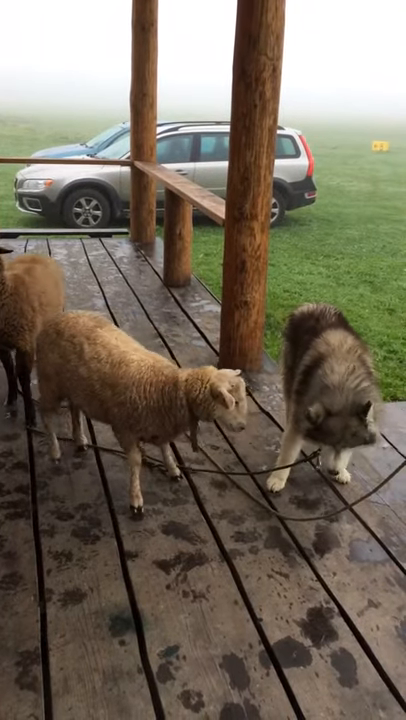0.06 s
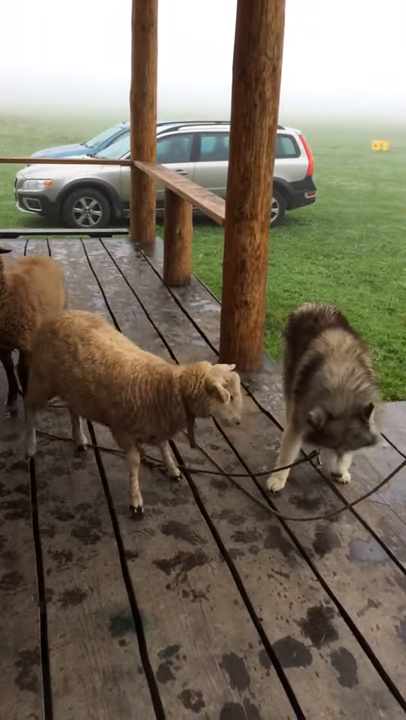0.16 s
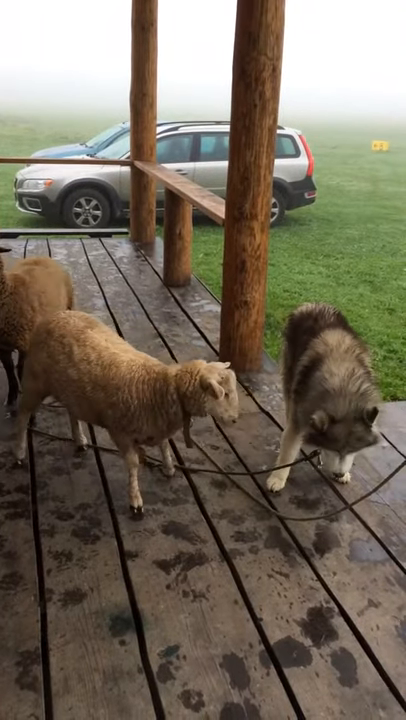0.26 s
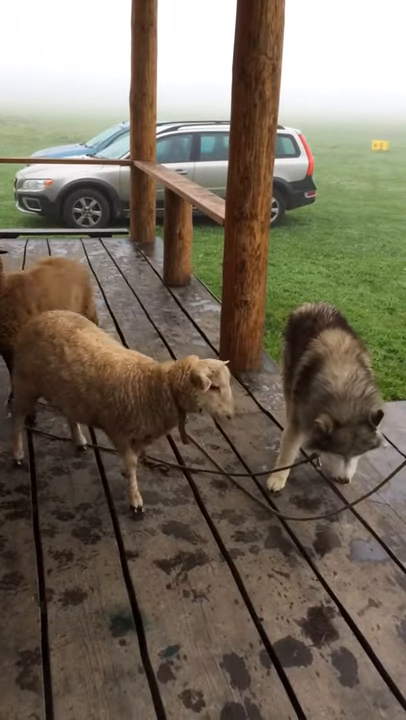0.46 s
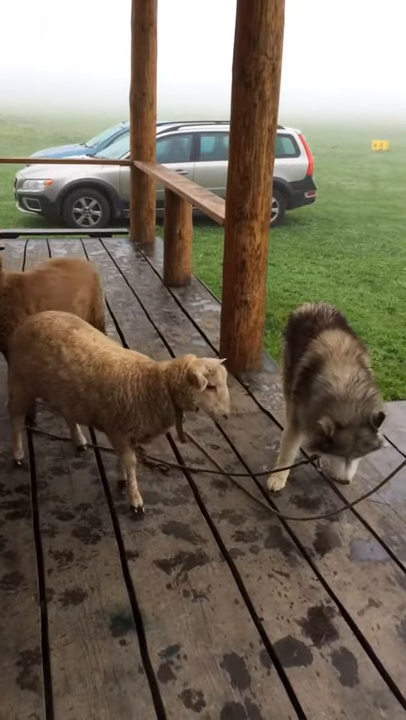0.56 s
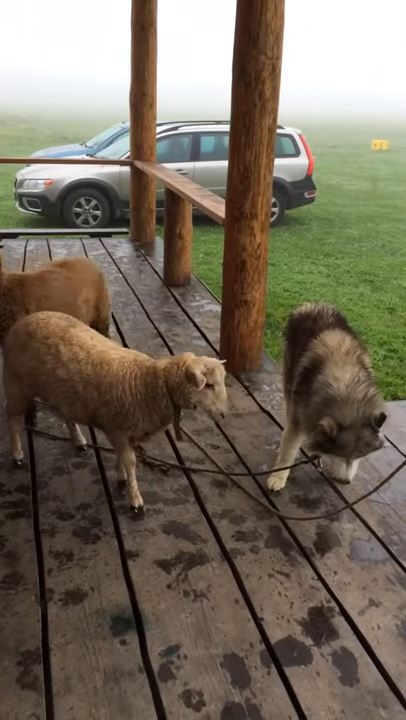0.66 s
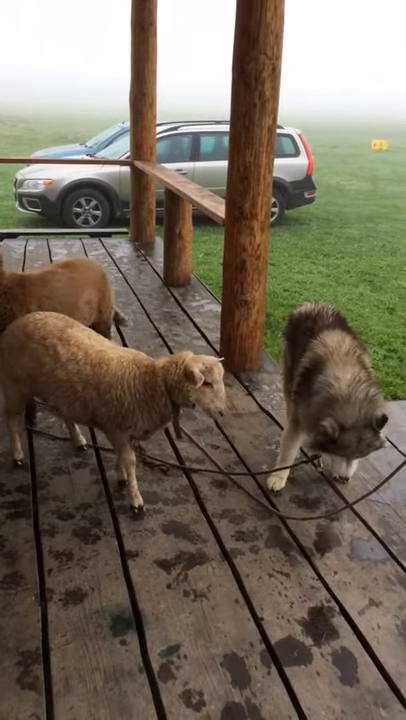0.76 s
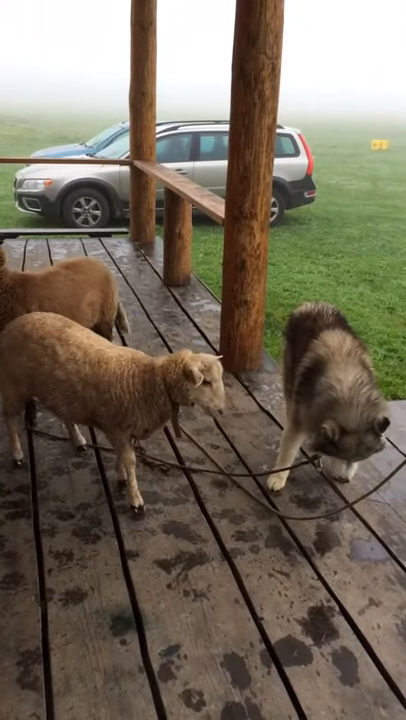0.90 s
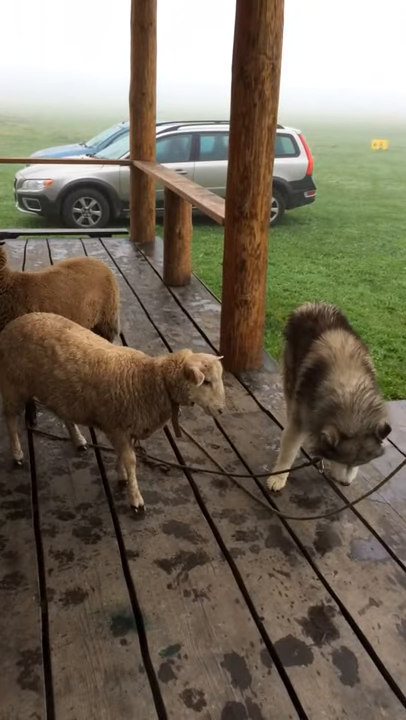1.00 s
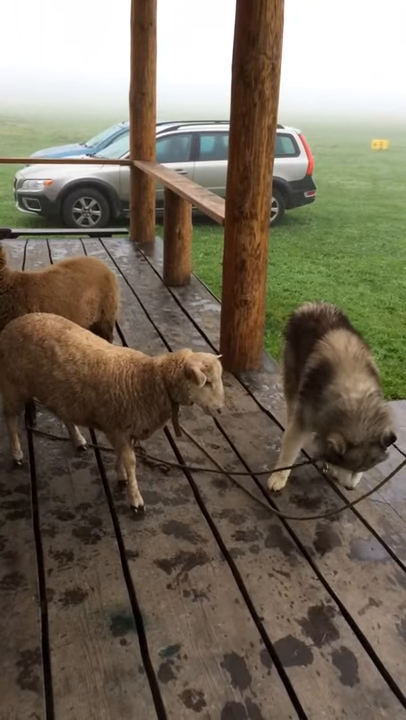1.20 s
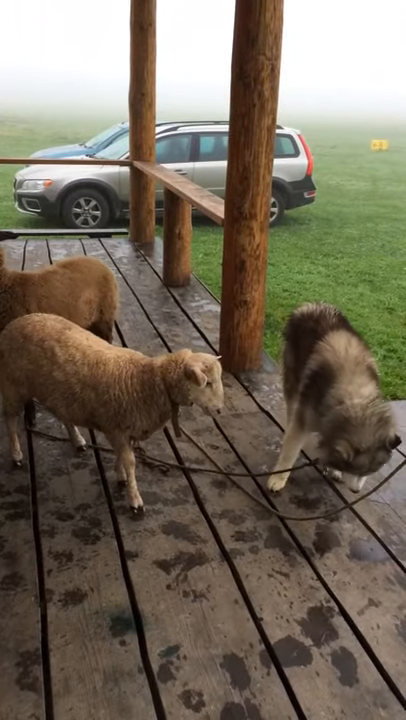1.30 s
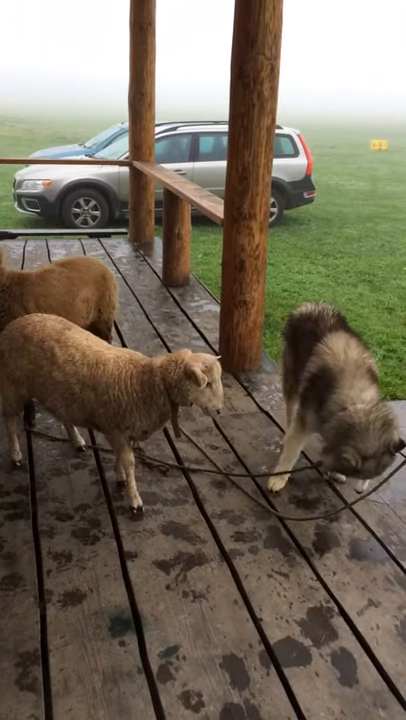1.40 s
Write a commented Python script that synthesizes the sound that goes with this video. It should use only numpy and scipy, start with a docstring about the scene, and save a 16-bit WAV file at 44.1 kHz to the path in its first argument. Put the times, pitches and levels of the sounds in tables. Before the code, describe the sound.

A few dull hoof knocks and thumps as sheep shift on a wooden porch.

```python
"""Sheep on a wet porch

Sheep shift their feet on the wet planks of a roofed wooden porch. Each hoof knocks on a plank,
then the weight thumps the deck, whose flexing wave runs back and forth along the boards.
Wet soles splat and scuff; the roof and wall answer briefly over quiet outdoor air."""
import sys
import numpy as np
from scipy import signal
from scipy.fft import rfft, irfft, next_fast_len
from scipy.io import wavfile
from scipy.ndimage import uniform_filter1d

SR = 44100
rng = np.random.default_rng(int(sys.argv[2]) if len(sys.argv) > 2 else 0)


def materialize(psi):
    """Save the field psi as 16-bit PCM at rate SR to the path in sys.argv[1].

    A 1-D psi becomes a single channel; in a 2-D psi each row is a channel.
    """
    bounded = np.clip(np.atleast_2d(psi).T, -1, 1)
    quanta = np.round(bounded * 32767).astype(np.int16)
    wavfile.write(sys.argv[1], SR, quanta)


N = 63945
EVENT_SAMPLES = SR // 2  # room for one hit and its tail


def amp(db):
    """Decibels to gain."""
    return 10 ** (np.asarray(db) / 20)


def unit_energy(x):
    """Scale x to a summed square of 1."""
    return x / np.sqrt(np.sum(x ** 2) + 1e-20)


def along(points, hz):
    """Read a curve of (frequency, value) points on a log frequency axis."""
    freqs, values = np.transpose(points)
    return np.interp(np.log(hz + 1), np.log(freqs + 1), values)


def clock(size=N):
    """Time of every sample in seconds."""
    return np.arange(size) / SR


def fade(t, t60):
    """Exponential decay, 60 dB down at t60."""
    return np.exp(-np.log(1000) * t / t60)


def add(track, start_s, x):
    """Mix x into the track from start_s on."""
    i = max(0, round(start_s * SR))
    track[i:i + len(x)] += x[:len(track) - i]


def noise(spectrum, size=N):
    """Coloured noise of rms 1."""
    padded = next_fast_len(size)
    colour = amp(along(spectrum, np.fft.rfftfreq(padded, 1 / SR)))
    x = irfft(rfft(rng.standard_normal(padded)) * colour, padded)[:size]
    return x / x.std()


def pulse(gain, size=4096):
    """Tight, minimum-phase pulse whose spectrum is gain(Hz)."""
    hz = np.fft.rfftfreq(size, 1 / SR)
    cepstrum = irfft(np.log(np.maximum(gain(hz), 1e-6)))
    cepstrum[1:size // 2] *= 2
    cepstrum[size // 2 + 1:] = 0
    return irfft(np.exp(rfft(cepstrum)))


def damped(modes):
    """One damped sine for each row of (frequency [Hz], level [dB], t60 [s])."""
    t = clock(EVENT_SAMPLES)
    return np.array([amp(db) * fade(t, t60) * np.sin(2 * np.pi * hz * t) for hz, db, t60 in modes])


def ring(sines, scatter_db=2):
    """The modes ring together, balanced a little differently at each blow."""
    gains = amp(scatter_db * rng.standard_normal((len(sines), 1)))
    return np.sum(gains * sines, axis=0)


def background(air_db=-68):
    """A bed of quiet outdoor air, with faint swishes as the animals move."""
    # dark outdoor air (frequency [Hz], level [dB])
    air_colour = [(15, -30), (28, -15), (60, -3), (100, 2.5), (160, 1.5), (300, -8.5), (600, -16),
                  (900, -16.5), (1400, -22.5), (6500, -26.5), (15000, -31.5)]
    # swish cues (centre time [s], level [dB], half length [s])
    swishes = [(0.47, -75, 0.056), (0.643, -72, 0.045), (1.28, -73.5, 0.051)]
    # swish tone (frequency [Hz], level [dB])
    swish_colour = [(200, -1), (900, 4.5), (2000, 2.5), (4500, -0.5), (7000, 2), (10000, -5), (15000, -26)]
    swell = sum(amp(db) * np.exp(-((clock() - s) / half_s) ** 2 / 2) for s, db, half_s in swishes)
    return amp(air_db) * noise(air_colour) + swell * noise(swish_colour)


def porch(x, room_db, predelay_s=0.0043, rise_s=0.0017, late_db=-24.5, late_t60=0.56):
    """Add the scattered answer of roof, posts and wall, different for every spot."""
    # decay of the short reverb (frequency [Hz], t60 [s])
    porch_t60 = [(150, 0.26), (1000, 0.12), (3000, 0.12), (7000, 0.17), (12000, 0.1)]
    hz, t, wash = signal.stft(rng.standard_normal(EVENT_SAMPLES), SR, nperseg=256)
    decay = fade(t, along(porch_t60, hz)[:, None]) + amp(late_db) * fade(t, late_t60)
    tail = signal.istft(wash * decay, SR, nperseg=256)[1]
    build_up = 1 - np.exp(-np.maximum(clock(len(tail)) - predelay_s, 0) / rise_s)
    answer = unit_energy(signal.fftconvolve(x, tail * build_up)[:len(x)])
    return x + amp(room_db) * np.sqrt(np.sum(x ** 2)) * answer


def splats(grain=0.5):
    """The film of water under a foot bursts in a short, grainy spray."""
    # wet splats and scuffs (time [s], level [dB], attack [s], t60 [s])
    cues = [(.056, -63.5, 0.0019, 0.022), (0.1868, -55, 0.00035, 0.015), (0.2223, -53.5, 0.00012, 0.031),
            (0.502, -51, 0.0021, 0.024), (0.615, -66, 0.0015, 0.02), (0.718, -56, 0.00055, 0.012),
            (0.7258, -58.5, .0004, .009), (.745, -59.5, 0.0025, 0.03), (0.822, -65.5, 0.00033, 0.028),
            (0.975, -60.5, 0.0015, 0.023)]
    # spray tone (frequency [Hz], level [dB])
    wet_colour = [(300, 11), (1500, 0.5), (4000, 0), (5000, -4), (7000, -1), (9500, -5.5), (12000, -4),
                  (15000, -11.5)]
    out, t = np.zeros(N), clock(EVENT_SAMPLES)
    for s, db, attack_s, t60 in cues:
        envelope = (1 - np.exp(-t / attack_s)) ** 2 * fade(t, t60)
        clumps = uniform_filter1d(rng.standard_normal(len(t)), size=24)
        spray = noise(wet_colour, size=len(t)) * np.exp(grain * clumps / clumps.std())
        splat = amp(db) * spray / spray.std() * envelope / envelope.max()
        add(out, s, porch(splat, room_db=2.5))
    return out


def trim_lows(x, low_cut_hz=62):
    """Knocks and thumps lose their deepest motion, below about 62 Hz."""
    return signal.sosfiltfilt(signal.butter(2, low_cut_hz, 'highpass', fs=SR, output='sos'), x)


def thumps(passes=4, deck_hz=170, joist_db=-21.5):
    """The weight shakes the joists and launches a flexing wave that runs to and fro in the deck."""
    # weight landing (time [s], level [dB], pitch [Hz], half length [s], return loss [dB], round trip [s])
    cues = [(0.091, -56.5, 159, 0.0082, 4, .056), (.255, -36.5, 152, .010, 7, 0.036),
            (.390, -54, 137, 0.0048, 4.5, .02), (.499, -44, 168, 0.0077, 0.5, .03),
            (.5145, -29, 184.5, 0.0057, 2.9, 0.033), (0.534, -34.5, 259, 0.003, 17, .03),
            (.619, -47, 206, 0.011, 3.5, .033), (.742, -40.5, 184, 0.0063, 3.5, .028),
            (.842, -48.5, 265, 0.0064, 1, .025), (.988, -37.5, 167, 0.0037, 5.5, .029),
            (.997, -41, 233.3, 0.0042, 12.5, .025)]
    # joist modes (frequency [Hz], level [dB], t60 [s])
    joist_modes = [(62, -20, .3), (131, -1.5, 0.2), (143, -5, 0.2), (161.8, 3, 0.36), (176, -13, 0.27),
                   (240.3, -2, 0.13)]
    settle, spread, extra_loss_db = 0.78, 0.23, 1.05  # per return: pitch pull, widening, growth of loss
    lead_s = .04  # pre-roll for the first swell
    out, joists = np.zeros(N), damped(joist_modes)
    for s, db, hz, half_s, loss_db, return_s in cues:
        wave = np.zeros(EVENT_SAMPLES)
        for k in range(passes):  # each return is inverted, weaker, longer and nearer the deck's pitch
            t = clock(EVENT_SAMPLES // 2) - lead_s - k * return_s
            pitch = deck_hz + (hz - deck_hz) * (1 - settle) ** k
            swell = np.exp(-np.minimum((t / (half_s * (1 + spread * k))) ** 2, 20))
            gain = (-1) ** k * amp(-k * loss_db - extra_loss_db * k * (k - 1) / 2)
            add(wave, 0, gain * swell * np.sin(2 * np.pi * pitch * t))
        add(wave, lead_s, amp(joist_db) * ring(joists))
        add(out, s - lead_s, amp(db) * porch(wave, room_db=-8.5))
    return out


def plank_chirp(x, travel_s=0.00101, at_hz=1080):
    """Low bending waves arrive later, so a plank smears a click into a quick downward chirp."""
    hz = np.fft.rfftfreq(2 * len(x), 1 / SR)
    lag_cycles = 2 * travel_s * np.sqrt(at_hz * hz)
    return irfft(rfft(x, 2 * len(x)) * np.exp(-2j * np.pi * lag_cycles))[:len(x)]


def hoof_click(low_hz, edge_hz, leak_db=-24, toe_db=-3.5):
    """The two toes of a cloven hoof land just apart; softer contacts lose their treble."""
    # hoof on wood (frequency [Hz], level [dB])
    click_colour = [(100, -27.5), (650, 0.5), (1050, 7.5), (1650, 5), (2150, -4.5), (2750, -2.5),
                    (3700, -3.5), (6000, 5.5), (15000, -15)]

    def contact(hz):
        """The click's tone between a gentle low cut and a steep, leaky high cut."""
        high_cut = 1 / (1 + (hz / edge_hz) ** 20) + amp(leak_db) / (1 + hz / edge_hz)
        low_cut = hz ** 2 / np.hypot(hz ** 2, low_hz ** 2)
        return amp(along(click_colour, hz)) * high_cut * low_cut

    click = unit_energy(pulse(contact))
    toes = np.pad(click, (0, EVENT_SAMPLES - len(click)))
    toe_gap_s = 0.001626 * rng.uniform(.5, 1.945)
    add(toes, toe_gap_s, amp(toe_db) * click)
    return unit_energy(toes)


def knocks():
    """A hoof clicks on a plank, ringing the plank's own note and the decking around it."""
    # hoof hits (time [s], level [dB], low cut [Hz], high cut [Hz], plank note [Hz], note level [dB],
    # note t60 [s], decking level [dB], reverb level [dB])
    cues = [(.0002, -38, 690, 3780, 2680, -1, 0.02, -9, -0.5),
            (0.029, -46, 520, 1170, 774, 7.5, 0.022, 1.5, 0.5),
            (.076, -48, 197, 722, 323, 9, 0.085, 5.5, 3), (0.184, -54, 300, 2410, 1500, -14, .02, 16, 7),
            (.2199, -14.5, 1090, 3980, 993, 2, 0.014, -29, 0),
            (0.374, -46, 200, 583, 362, 5.5, 0.12, 1, 6.5),
            (0.48, -29.5, 684, 2590, 747, 6.5, 0.086, -1, 1),
            (.495, -35.5, 395, 920, 734, 10, 0.056, 4, -1),
            (0.6113, -42, 485, 3100, 1120, -2.5, 0.024, 12, 12),
            (0.613, -33.5, 255, 1000, 817, 6.5, .035, 6, -7.5),
            (0.7232, -39, 300, 3560, 615, 2, 0.019, 8.5, 11),
            (.741, -36, 310, 2160, 1910, 2, .02, -1, -1.5),
            (0.8231, -23.5, 815, 3070, 1170, 2, .04, 7, 0.3), (0.975, -41, 348, 2370, 703, 0, 0.016, 8, 6)]
    # decking modes (frequency [Hz], level [dB], t60 [s])
    deck_modes = [(290, -32, 0.037), (300.5, -7, 0.26), (355, 7, 0.04), (402, 0, 0.043),
                  (501.7, 4.5, 0.047), (681, -3.5, 0.072), (838, -10.5, 0.051), (1031, 0, 0.038),
                  (1400, -12.5, 0.064), (1570, -19.5, 0.082), (1920, -32, 0.026)]
    out, decking = np.zeros(N), damped(deck_modes)
    for s, db, low_hz, edge_hz, note_hz, note_db, note_t60, deck_db, room_db in cues:
        note = amp(note_db) * unit_energy(damped([(note_hz, 0, note_t60)])[0])
        body = amp(deck_db) * unit_energy(ring(decking))
        hit = note + body + hoof_click(low_hz, edge_hz)
        add(out, s, amp(db) * porch(plank_chirp(hit), room_db))
    return out


def scene():
    """Wet hooves on the deck over the outdoor air, in mono."""
    return (trim_lows(knocks() + thumps()) + splats() + background())[None]


def record(dry):
    """A brick-wall high cut trims the very top of the mix."""
    top_hz = 15400
    padded = next_fast_len(N + EVENT_SAMPLES)
    passband = np.fft.rfftfreq(padded, 1 / SR) < top_hz
    return irfft(rfft(dry, padded) * passband, padded)[:, :N]


dry = scene()
out = record(dry)
materialize(out)
```